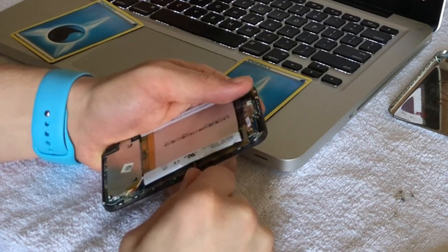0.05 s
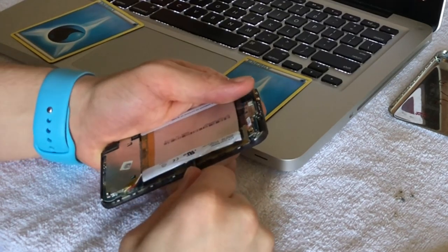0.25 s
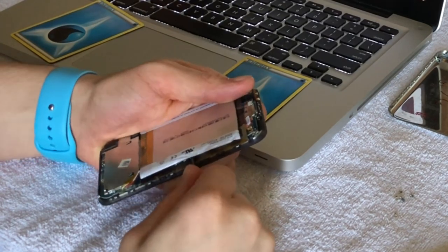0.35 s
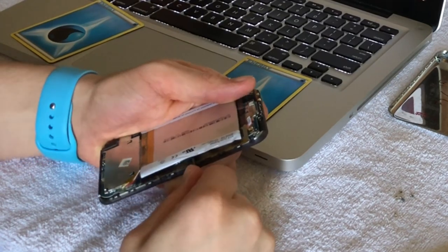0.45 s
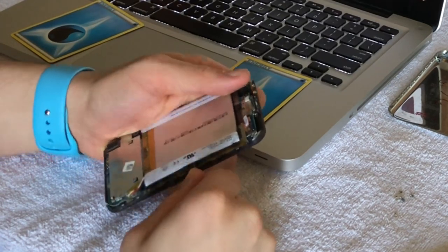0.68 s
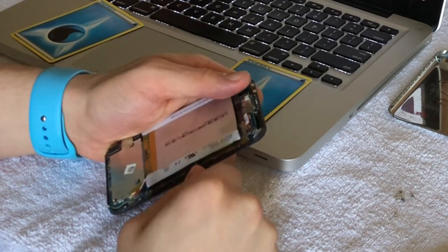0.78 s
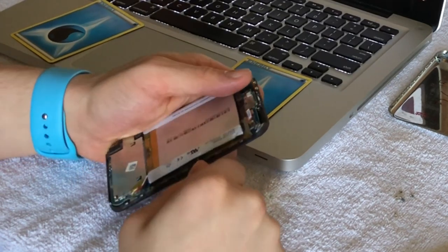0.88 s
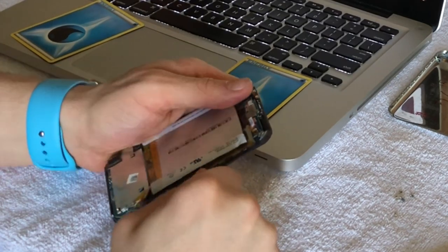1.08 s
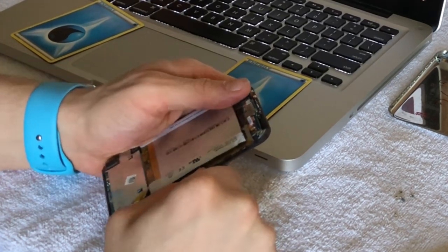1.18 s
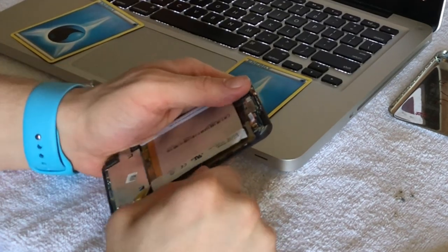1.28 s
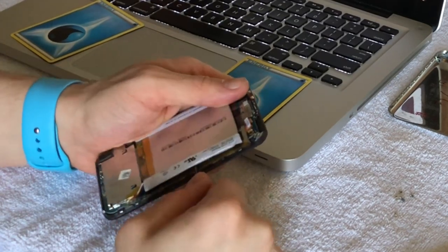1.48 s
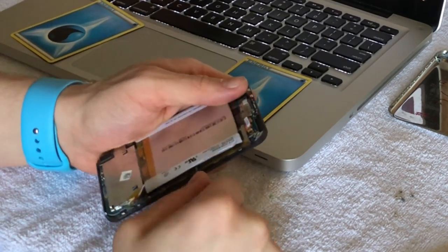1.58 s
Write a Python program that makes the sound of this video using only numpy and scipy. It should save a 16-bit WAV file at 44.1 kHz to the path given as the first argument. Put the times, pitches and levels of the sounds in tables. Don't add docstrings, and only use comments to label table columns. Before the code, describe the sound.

Fingers pry a small open electronic device: faint ticks, a crackling run of sharp snaps, a second louder run, then sparse tiny clicks and rubbing over soft hiss, heard close in a small room, mono.

```python
import sys
import numpy as np
from scipy import signal
from scipy.fft import rfft, irfft
from scipy.io import wavfile
from scipy.ndimage import uniform_filter1d

SR = 44100
rng = np.random.default_rng(int(sys.argv[2]) if len(sys.argv) > 2 else 0)


def wav_record(signal):
    frames = np.transpose(np.atleast_2d(signal))
    bounded = np.clip(frames, -1, 1)
    quanta = np.round(bounded * 32767).astype(np.int16)
    wavfile.write(sys.argv[1], SR, quanta)


def ratio(d):
    e = np.asarray(d, float) / 20
    return 10 ** e


N = 72765

LEAD_S = .0006


def evened(x):
    return x / np.sqrt(np.mean(x ** 2) + 1e-20)


def read(points, hz):
    f, value = np.transpose(points)
    return np.interp(np.log(hz + 1), np.log(f + 1), value)


def add(mix, s, sound):
    part = mix[round(s * SR):][:len(sound)]
    part += sound[:len(part)]


def bell(hz, centre_hz, octaves):
    return np.exp(-.5 * (np.log2((hz + 1) / centre_hz) / octaves) ** 2)


def ring(t, hz, width_hz):
    u = np.pi * width_hz * t
    return u * np.exp(1 - u) * np.sin(2 * np.pi * hz * t)


def hiss():
    # (frequency [Hz], level per Hz [dB])
    hiss_shape = [(30, -47.5), (46, -14), (75, -2.5), (280, -9), (600, -17.5), (3000, -28), (9000, -30),
                  (16000, -35.5)]
    frames, hz = N // 256 + 5, np.fft.rfftfreq(1024, 1 / SR)
    a, b, patches = rng.standard_normal((frames, 513, 3)).T
    patches = uniform_filter1d(patches, size=14, axis=0)
    patches = evened(uniform_filter1d(patches, size=12, axis=1))
    z = (a + 1j * b) * ratio(read(hiss_shape, hz)[:, None] + 0.4 * patches)
    return ratio(-68) * evened(signal.istft(z, nperseg=1024, noverlap=768)[1][:N])


def hum():
    # (frequency [Hz], rms level [dB])
    tones = [
        (60, -69),
        (120, -67.5),
        (241, -78.5),
        (276, -81.5),
    ]
    wobble, width_hz = 0.43, 5.4
    out, t = np.zeros(N), np.arange(N) / SR
    r = np.exp(-np.pi * width_hz / SR)
    for f, db in tones:
        re, im = signal.lfilter([1], [1, -2 * r, r * r], rng.standard_normal((2, N)))
        waver = 1 + wobble * (evened(re) + 1j * evened(im))
        out += ratio(db) * evened((waver * np.exp(2j * np.pi * f * t)).real)
    return out


def room(x):
    # (frequency [Hz], T60 [s])
    decay = [(500, 1), (1320, 0.31), (3480, 0.35), (9190, 0.27)]
    # (frequency [Hz], level [dB])
    colour = [(400, -5), (1000, 1.5), (2200, 7.5), (3500, 12), (6000, 9), (9000, 5.5), (12000, 1.5),
              (16000, 2.5)]
    gap_s, rise_s, tail_db = .0065, .004, -10
    hz, t, z = signal.stft(rng.standard_normal(SR // 2), SR, nperseg=128)
    fading = ratio(read(colour, hz)[:, None] - 60 * t / read(decay, hz)[:, None])
    tail = signal.istft(z * fading, SR, nperseg=128)[1]
    tail = tail * np.clip((np.arange(len(tail)) / SR - gap_s) / rise_s, 0, 1)
    return signal.fftconvolve(x, ratio(tail_db) * tail / np.linalg.norm(tail))


def rubs():
    # (start [s], length [s], level [dB], centre frequency [Hz])
    pushes = [
        (.17, 0.023, -66.5, 4030),
        (.421, 0.028, -69, 2800),
        (.66, 0.17, -70, 3177),
        (1.0, 0.062, -76.5, 8950),
        (1.05, 0.11, -80, 2400),
        (1.24, 0.095, -75.5, 2586),
        (1.56, 0.069, -72.5, 1670),
    ]
    out, size = np.zeros(N), 8000
    hz, t = np.fft.rfftfreq(size, 1 / SR), np.arange(size) / SR
    for s, length_s, db, centre_hz in pushes:
        grain_db = 3 * evened(uniform_filter1d(rng.standard_normal(size), size=90))
        rough = rng.standard_normal(size) * ratio(grain_db)
        sound = evened(irfft(rfft(rough) * bell(hz, centre_hz, octaves=1)))
        swell = np.sin(np.pi * np.minimum(t / length_s, 1))
        add(out, s, ratio(db) * sound * swell)
    return out


def slip(s, level_db, bright_hz, burst_ms, low_db, mid_db):
    # (frequency [Hz], width [Hz], level [dB])
    low_modes = [
        (1395, 422, 0),
        (1686, 420, -11.5),
        (818.6, 1600, -17),
    ]
    # (frequency [Hz], width [Hz], level [dB])
    mid_modes = [
        (3780, 760, -4),
        (4200, 870, -3),
        (4880, 1400, -10),
    ]
    rattle_db, rattle_t60_s = -27, .014
    low_lag_s = .0007
    wall_s, wall_db = .0096, -4
    thud_hz, thud_ms = 4500, 0.026
    low_send_db, thud_send_db = 3, -6
    t = np.arange(900) / SR - LEAD_S
    burst = -np.exp(-.5 * (t * 1000 / max(burst_ms, .05)) ** 2) * np.cos(2 * np.pi * bright_hz * t)

    hits = rng.standard_normal(len(t)) * ratio(rattle_db - 60 * t / rattle_t60_s) * (t > -LEAD_S / 2)
    rattle = np.convolve(hits, burst[:56])[:len(t)]

    stiff = 1.1 if s > .3 else 1
    late, after = np.maximum(t - low_lag_s, 0), np.maximum(t, 0)
    low = ratio(low_db) * sum(ratio(db) * ring(late, f * stiff, w) for f, w, db in low_modes)
    mid = ratio(mid_db) * sum(ratio(db) * ring(after, f * stiff, w) for f, w, db in mid_modes)
    wall = ratio(wall_db) * np.roll(low, round(wall_s * SR)) * (t > wall_s)
    near = burst + rattle + low + mid + wall

    thud = np.exp(-.5 * (t * 1000 / thud_ms) ** 2) * np.cos(2 * np.pi * thud_hz * t)
    sent = burst + rattle + ratio(low_send_db) * low - ratio(thud_send_db + mid_db / 2) * thud
    return ratio(level_db) * near, ratio(level_db) * sent


def slips():
    snap_times = [.20735, .20772, .20912, .2096, .21132, .21305, .21375, .21505, .21665, .45813, .45845,
                  .46185, .48415, .48447, .48595, .48845]
    tick_times = [.1224, .1445, .1735, .1851, .1896, .2014, .4161, .4349, .4388, .4465, .704, .7488, .7522,
                  .764, .7978, .8002, .8946, .996, 1.025, 1.354, 1.4345, 1.578]
    # (level [dB], brightest frequency [Hz], burst [ms], low ring [dB], mid ring [dB])
    snaps = [(-16, 12900, .07, -10, -9), (-19, 12100, .07, -14, -9), (-3, 10300, .055, -22, -15),
             (-15, 11000, .06, -30, -14), (-4, 12400, .055, -20, -16), (-3, 13300, .11, -24, -30),
             (-14, 13100, .1, -26, -26), (-18, 12800, .07, -20, -22), (-22, 12600, .06, -20, -22),
             (2, 11300, .05, -33, -20), (-9, 11300, .055, -38, -17), (-25, 11800, .06, -30, -30),
             (-5.5, 10600, .05, -32, -22), (-12, 9600, .06, -30, -18), (-15, 12500, .06, -23, -24),
             (-23, 11600, .07, -26, -24)]
    ticks = [(-43, 14000, 0.11, -11, -7.5), (-47.5, 9400, .06, -22, -25), (-48, 12100, .055, -17, -14),
             (-54, 11000, 0.071, -25, -15.5), (-45, 11500, .1, -20.5, -20), (-38, 17000, .08, -25.5, -27),
             (-52, 10200, .2, -33.5, -29.5), (-42.5, 33000, .05, -39, -31), (-49, 11500, .15, -4.5, -44),
             (-47.5, 11800, .055, -36, -35), (-51.5, 11000, 0.075, -28, -29), (-54, 6040, 0.054, -6, -12),
             (-39.5, 12600, 0.055, -24.5, -27), (-53, 13000, 0.079, -23, -18), (-57, 11000, .05, -25, -25),
             (-42, 13000, .05, -28, -22), (-47, 10700, 0.067, -39, -26), (-59, 7800, .06, -38, -35),
             (-54.5, 8400, .06, -42, -42), (-61.5, 13000, .06, -35, -35), (-47, 6800, 0.12, -46, -17),
             (-57, 6105, 0.063, -14, -6)]
    out = np.zeros(N)
    for s, row in zip(snap_times + tick_times, snaps + ticks):
        near, sent = slip(s, *row)
        add(out, s - LEAD_S, near)
        add(out, s - LEAD_S, room(sent))
    return out


def scene():
    return (hiss() + hum() + rubs() + slips())[None]


def roll_off(x):
    return signal.sosfilt(signal.butter(12, 17150, fs=SR, output="sos"), x)


def record(dry):
    low_pass = signal.firwin(255, 15950, window=("kaiser", 8), fs=SR)
    mix = signal.oaconvolve(dry, low_pass[None], "same")
    return roll_off(mix)


dry = scene()
out = record(dry)
wav_record(out)
```